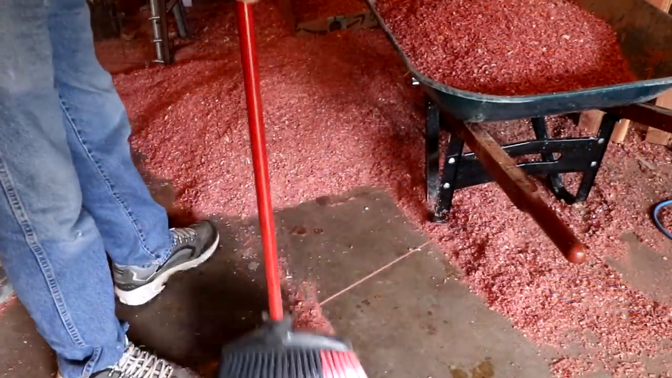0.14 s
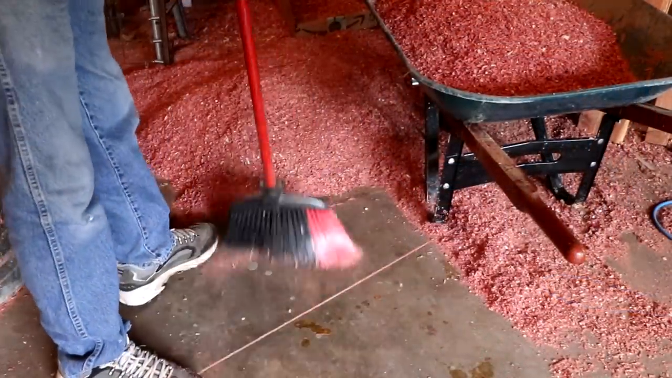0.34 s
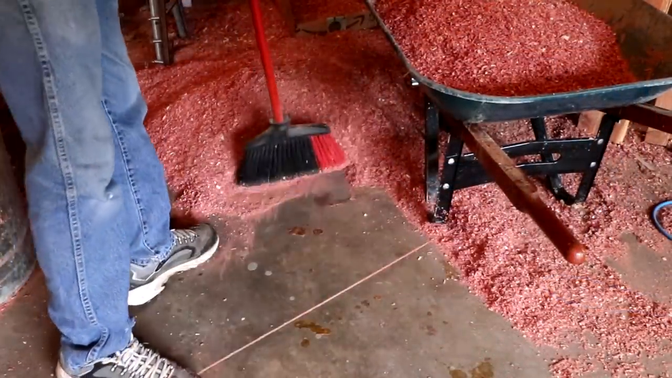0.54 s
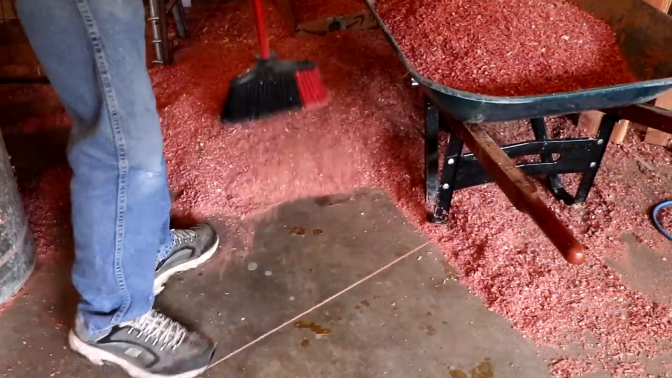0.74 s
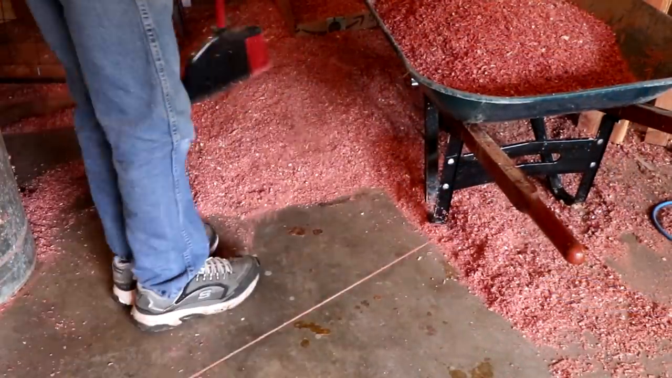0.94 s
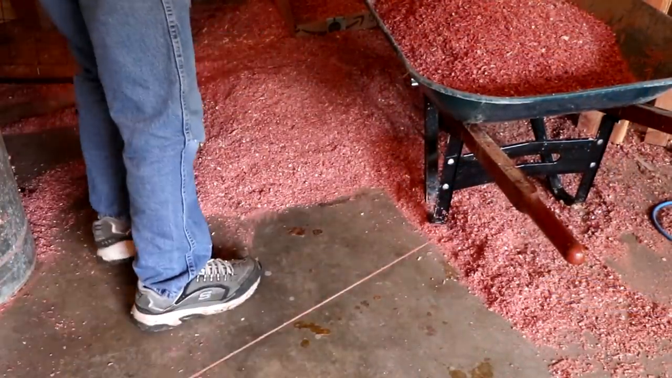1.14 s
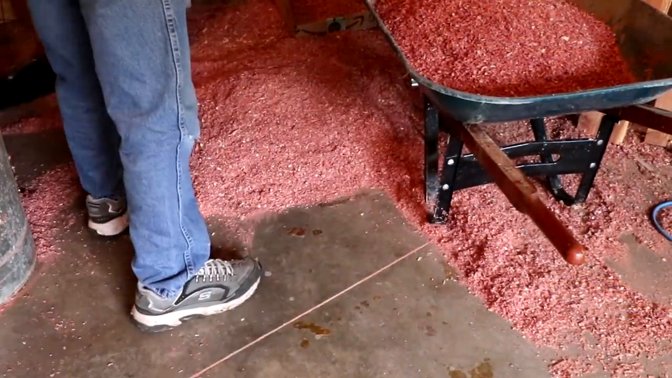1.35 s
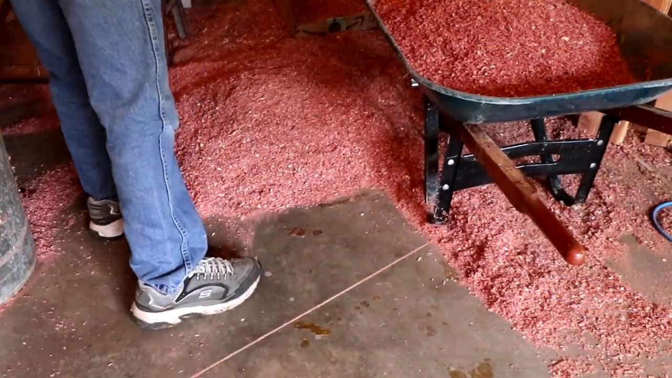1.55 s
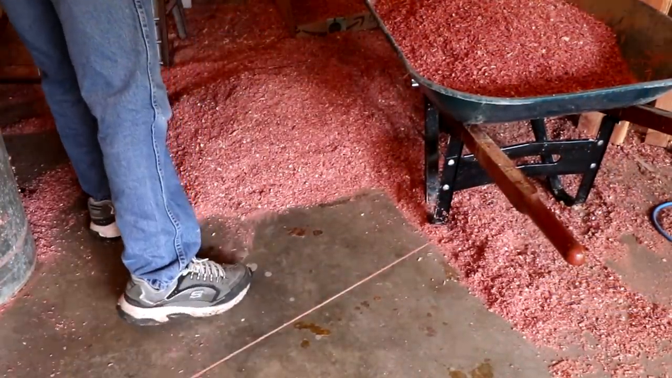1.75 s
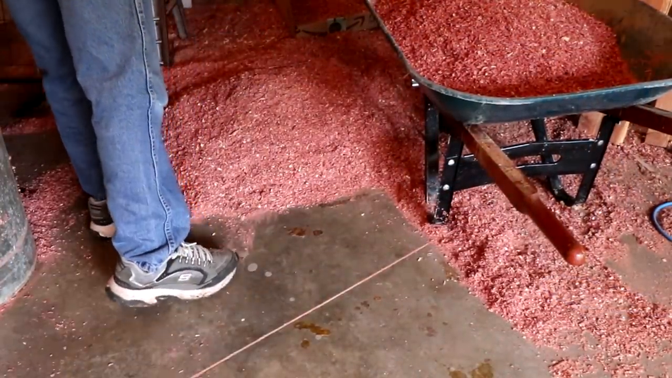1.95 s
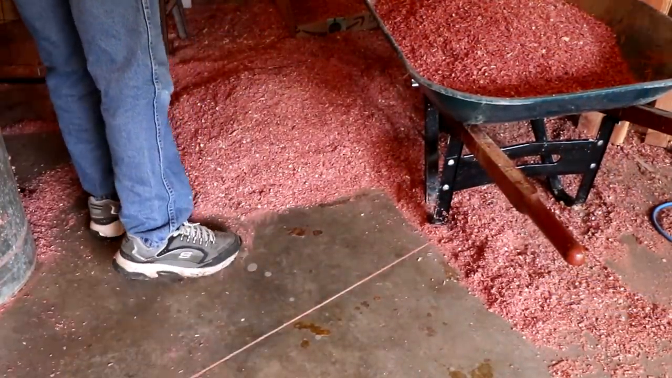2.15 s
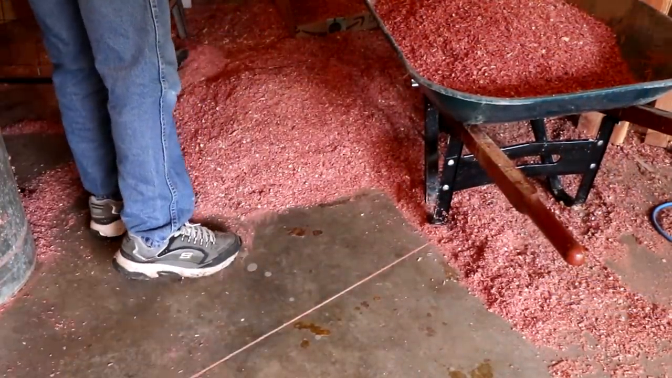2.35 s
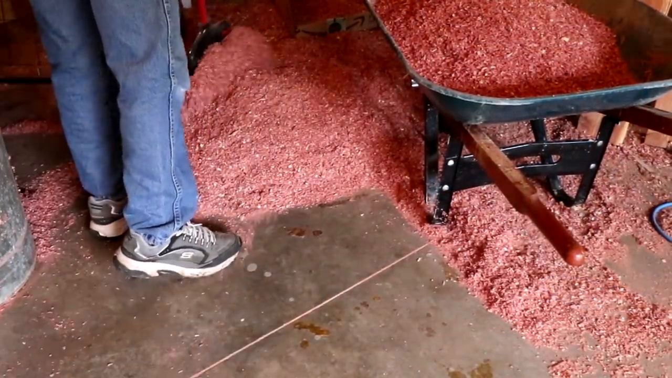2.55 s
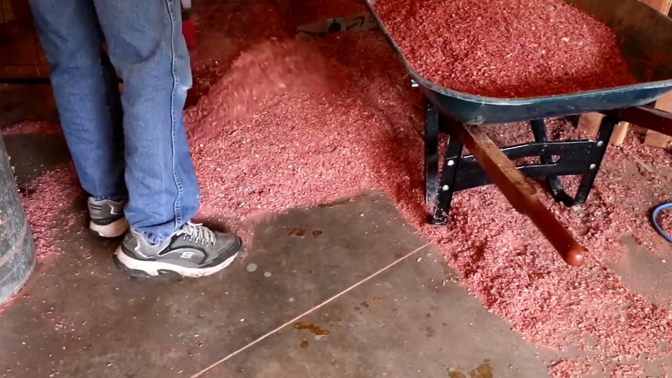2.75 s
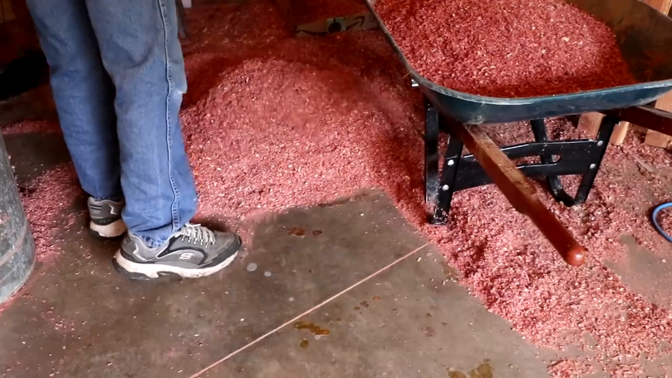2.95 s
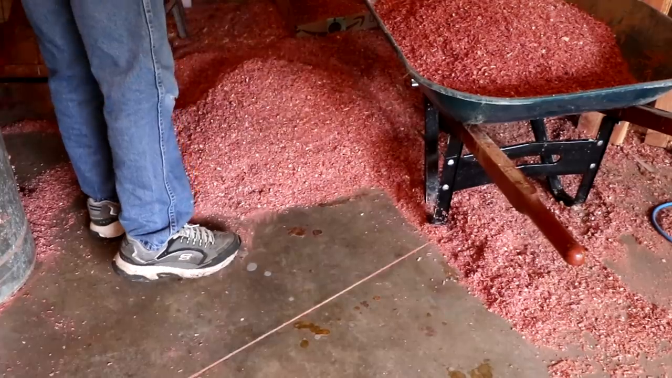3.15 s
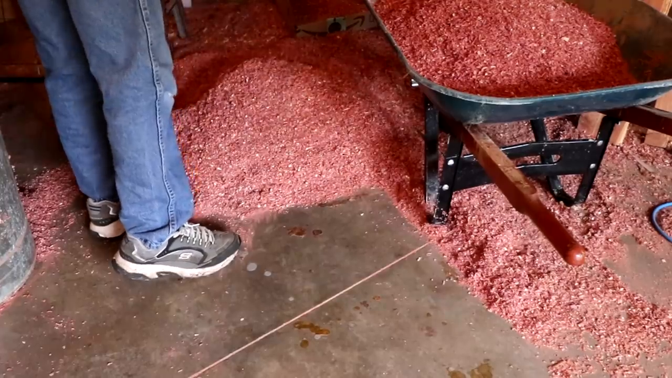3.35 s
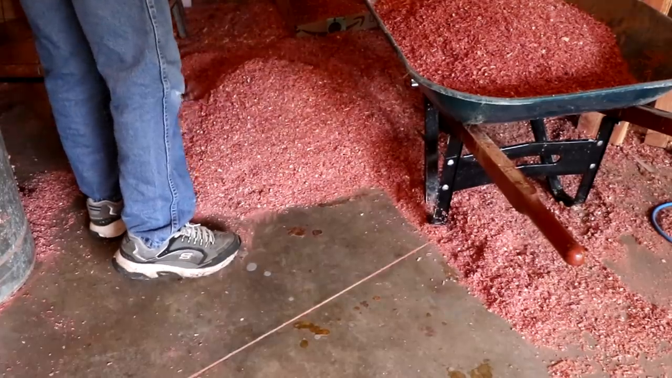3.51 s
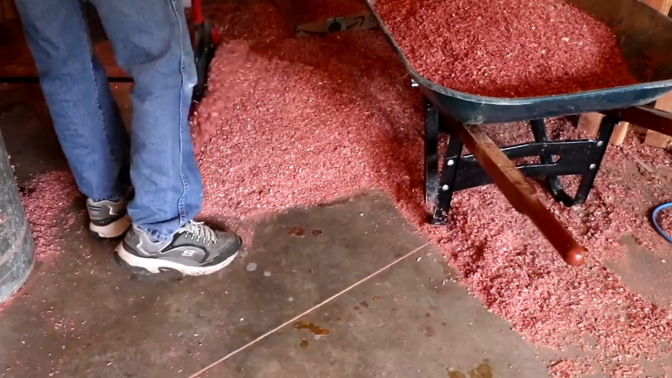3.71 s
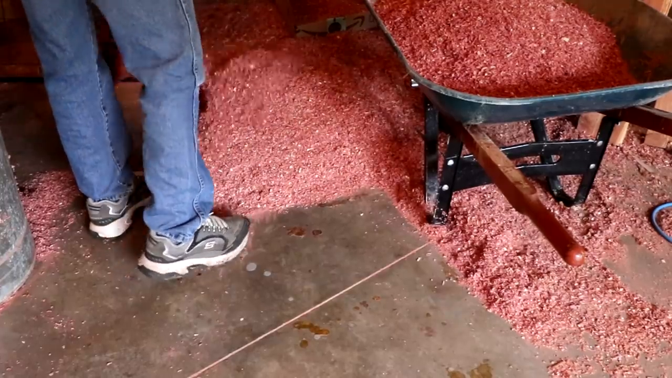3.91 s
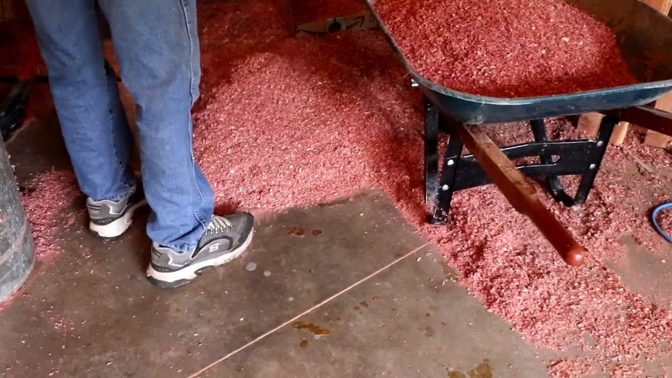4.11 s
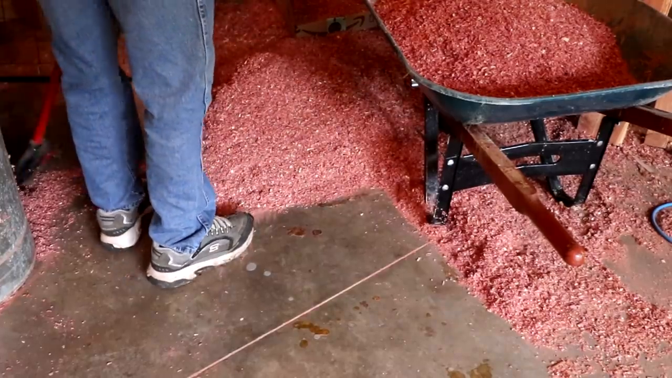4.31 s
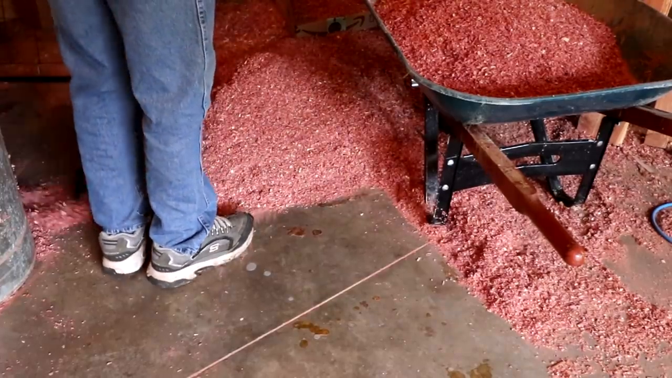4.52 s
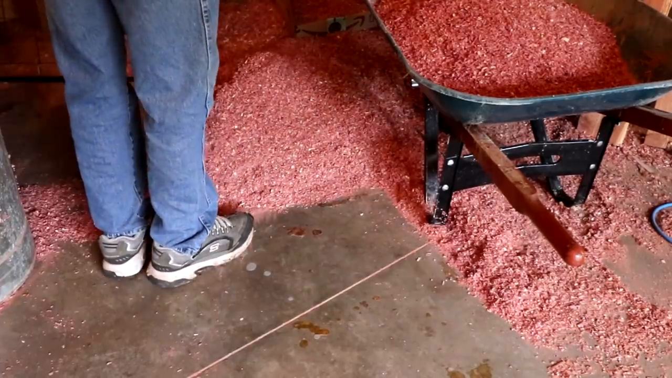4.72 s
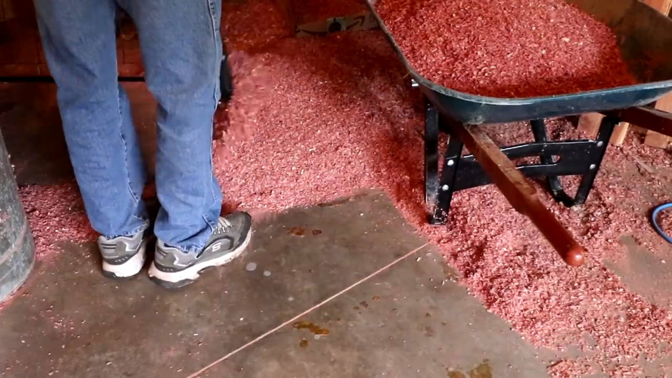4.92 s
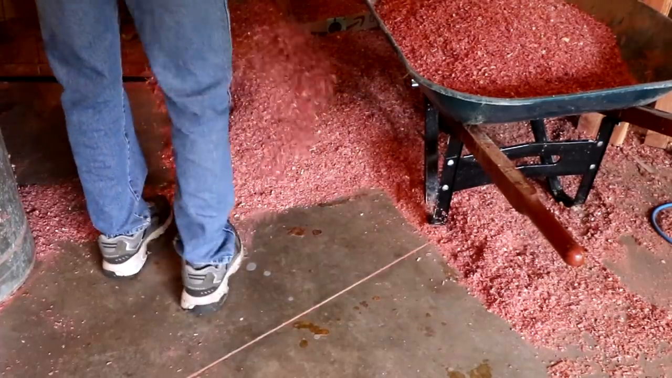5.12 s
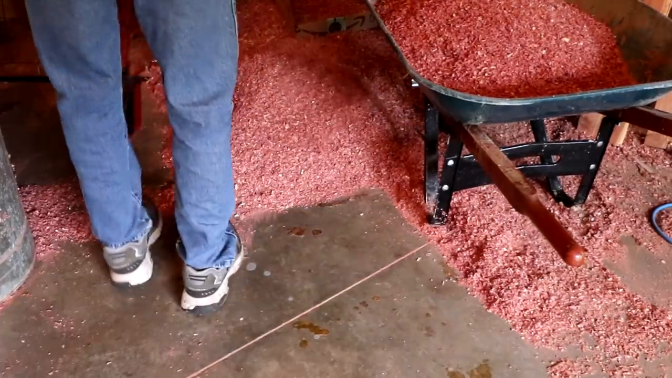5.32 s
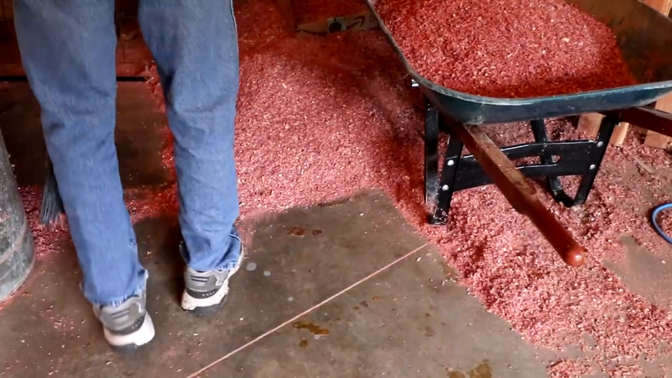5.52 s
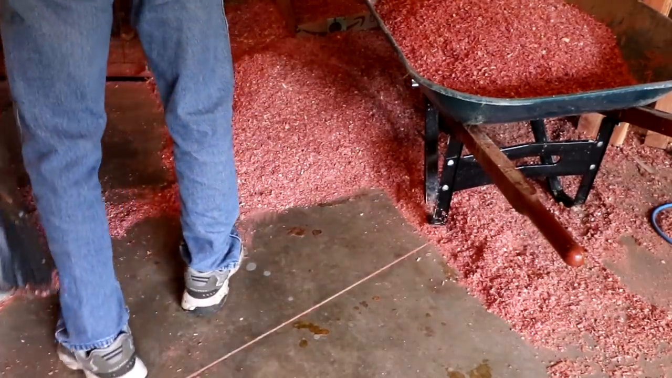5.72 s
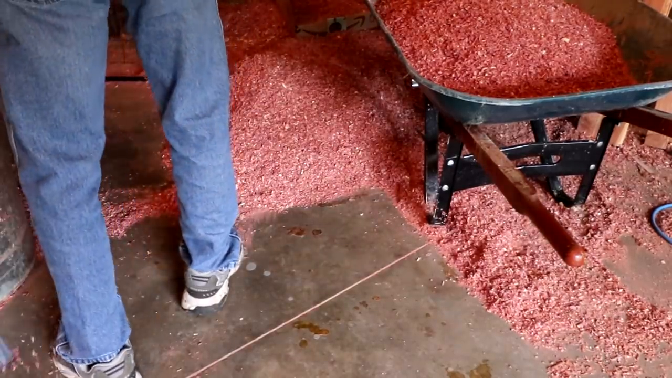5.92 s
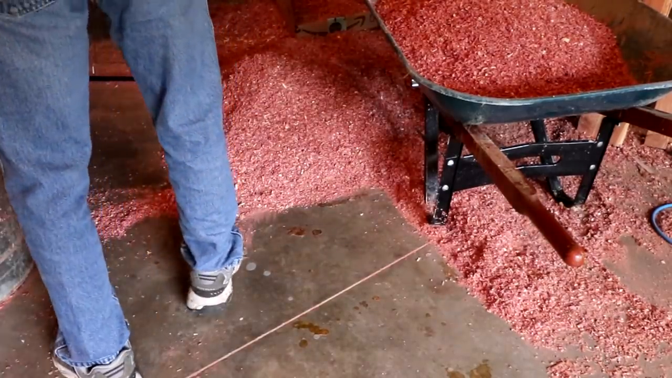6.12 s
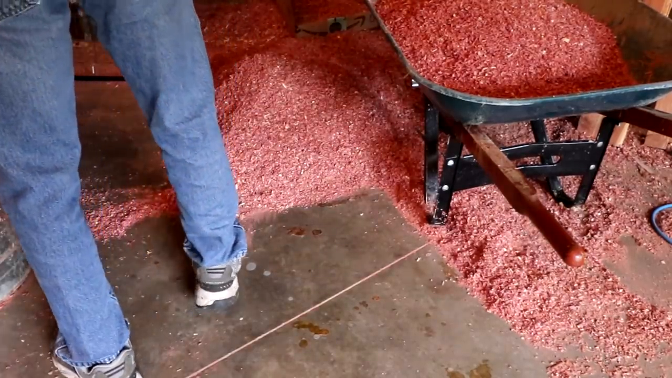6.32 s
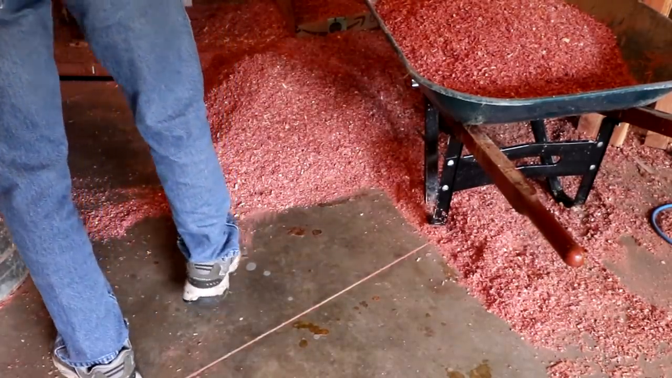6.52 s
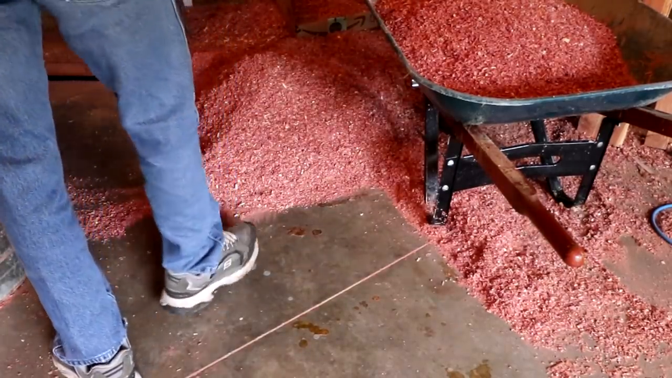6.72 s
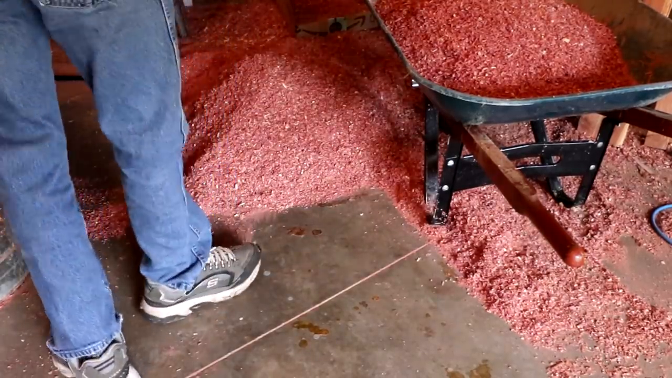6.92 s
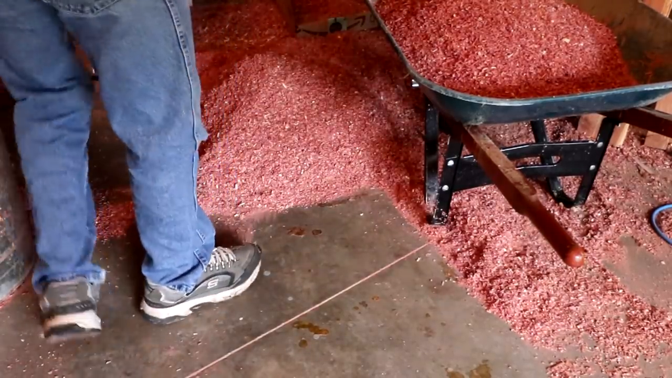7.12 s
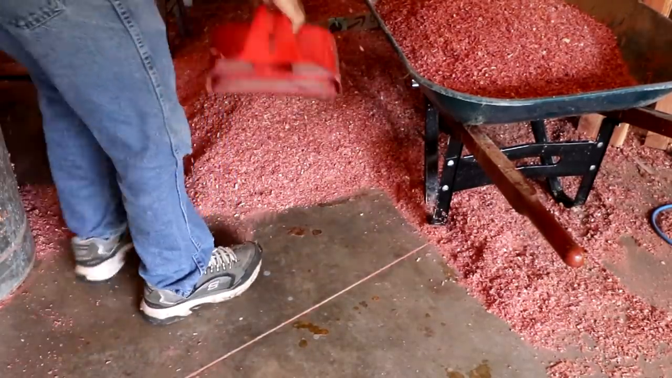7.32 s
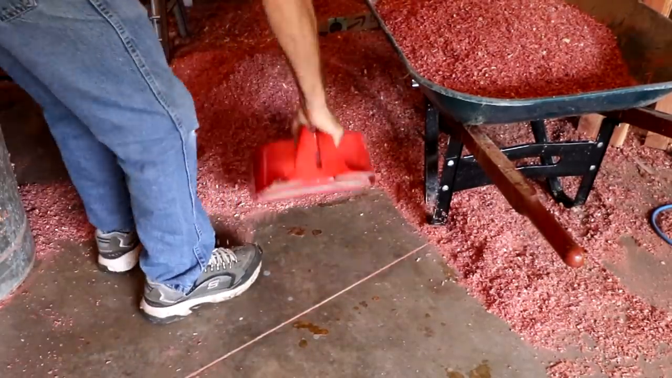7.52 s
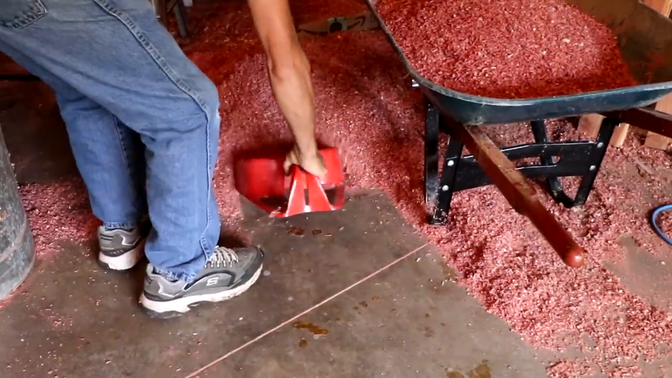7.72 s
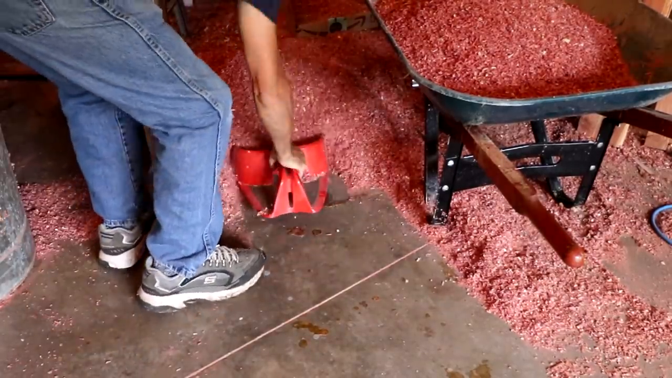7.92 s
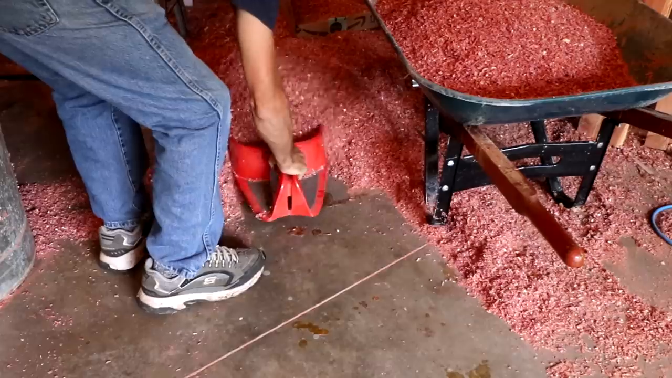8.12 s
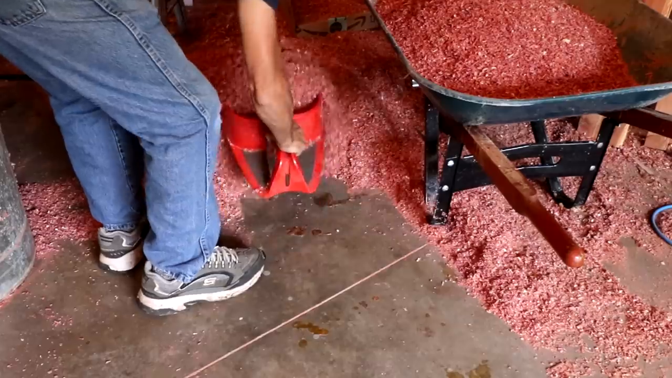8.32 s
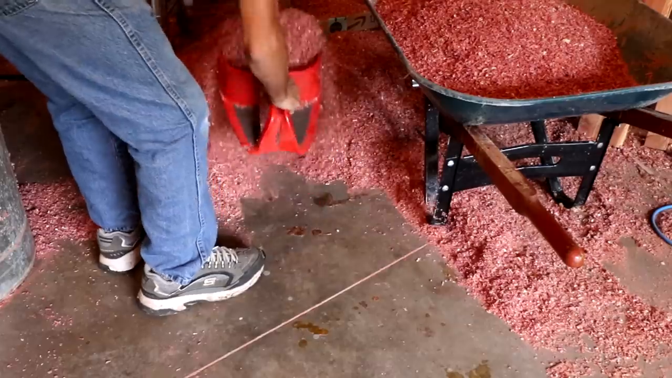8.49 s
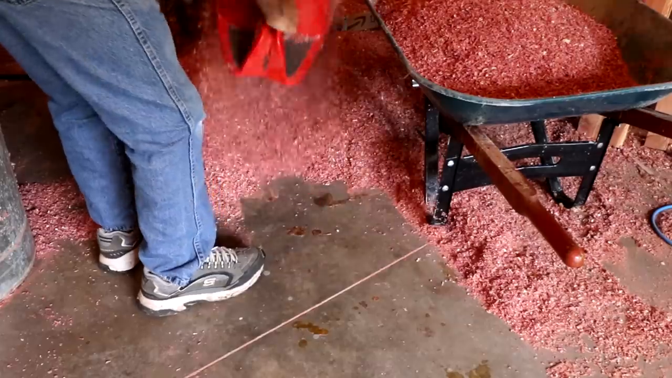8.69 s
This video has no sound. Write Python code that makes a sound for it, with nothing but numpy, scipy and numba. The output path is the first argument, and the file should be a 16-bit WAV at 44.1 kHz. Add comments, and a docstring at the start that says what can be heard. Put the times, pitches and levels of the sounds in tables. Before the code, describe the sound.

A small shed with short reflections, heard close in stereo, over faint air hiss and an intermittent low hum. From 0 to 0.6 s a broom sweeps dry shavings over concrete in a strong, bristly swish, followed by a short gritty scrape at 1.0 and a soft scuff with a heel thud near 1.4. Gentler rustling strokes come around 2.1 and 3.4, then a sharper brush at 4.3 trailing into rustle until 4.7, and a small scuff at 5.1. From about 5.95 to 6.7 the broom knocks a hollow bin: irregular clacks and rattles, the hardest crack at 6.33, a deep boom at 6.65 rumbling on. Faint steps and rustle follow, with dull thuds near 7.5. At 7.72 a plastic dustpan slaps down loudly with a low thump, its lip rasping and chattering on concrete until 8.05. A soft thud, then quiet faint rustling to the end at about 8.7.

```python
"""Sweeping a shed floor

A broom sweeps wood shavings over concrete, soles scuff, and heels and broom head thud: shaped noise and damped modes.
The broom knocks a hollow bin; a plastic dustpan slaps down and is shoved into the heap, its lip chattering.
Deep noise rumbles under two of the bin knocks and the pan's landing; air noise and intermittent hum sines lie beneath.
A camera with two close ports turns down after loud peaks and clips what still exceeds full scale."""
import sys
import numpy as np
from scipy import signal
from scipy.fft import rfft, irfft
from scipy.io import wavfile
from scipy.ndimage import uniform_filter1d, map_coordinates
from numba import njit

SR = 44100
rng = np.random.default_rng(int(sys.argv[2]) if len(sys.argv) > 2 else 0)


def to_wav(s):
    """Save 16-bit WAV."""
    ch = np.atleast_2d(s).T  # columns
    pcm = np.round(np.clip(ch, -1, 1) * 32767)  # PCM
    wavfile.write(sys.argv[1], SR, pcm.astype(np.int16))


def gain_from_db(level_db):
    """Turn a decibel level (scalar or array-like) into a linear amplitude factor."""
    decades = np.asarray(level_db, float) / 20
    return 10 ** decades


N = 385855
TIME = np.arange(N) / SR
OPPOSITE = np.array([[1], [-1]])  # signs of a difference signal at the left and right port


def on_log_hz(points, hz):
    """Logarithmic frequency scale: interpolate a (Hz, value) table along it."""
    f, v = np.transpose(points)
    return np.interp(np.log(hz + 1), np.log(f + 1), v)


def unit(x):
    """Normalisation: scale to rms 1."""
    return x / np.sqrt(np.mean(x ** 2))


def colour(x, points):
    """Minimum-phase filtering: a causal filter of unit energy, from the folded cepstrum of the log gain."""
    size = 4096
    hz = np.arange(size // 2 + 1) * SR / size
    cepstrum = irfft(np.log(gain_from_db(on_log_hz(points, hz))))
    cepstrum[1:size // 2] *= 2
    cepstrum[size // 2 + 1:] = 0
    h = irfft(np.exp(rfft(cepstrum)))[:size // 2]
    return signal.oaconvolve(x, h / np.sqrt(np.sum(h ** 2)))[:len(x)]


def ring(x, modes):
    """Modal resonance: damped sines (Hz, dB, t60 in s) as a filter of unit energy."""
    t = TIME[:SR // 2]
    h = 0
    for k, (f, db, t60) in enumerate(modes):
        # neighbours move in opposite sense, so little air is pushed below them
        h = h + (-1) ** k * gain_from_db(db) * np.sin(2 * np.pi * f * t) * 1000. ** (-t / t60)
    return signal.oaconvolve(x, h / np.sqrt(np.sum(h ** 2)))[:len(x)]


def walk(rate):
    """Slow random modulation: levels held 1 / rate s, slewed twice; spread near 1."""
    k = int(SR / rate)
    held = np.repeat(rng.standard_normal(N // k + 1), k)
    return 1.3 * uniform_filter1d(uniform_filter1d(held, k), k)[:N]


def grains(spread_db, hold_ms, count=N):
    """Granular friction: noise of rms 1 whose size jumps every hold_ms, rare grains much larger."""
    k = max(int(hold_ms * SR / 1000), 1)
    jumps_db = spread_db * np.minimum(rng.exponential(size=count), 4)
    size = np.repeat(gain_from_db(jumps_db), k)[:count]
    return unit(size * rng.standard_normal(count))


def gains(table):
    """Piecewise-linear envelopes: the dB columns of a time table, -99 dB outside it."""
    rows = np.array(table)
    return [np.interp(TIME, rows[:, 0], c, left=-99, right=-99) for c in rows.T[1:]]


def ports(x, pan_db, lead):
    """Level and time differences: a tilt in dB, and the left port hears x `lead` samples earlier."""
    late = map_coordinates(x, [np.arange(len(x)) - lead], order=3)
    return np.array([x * gain_from_db(pan_db / 2), late * gain_from_db(-pan_db / 2)])


# Reverberation time of the shed. Each row: frequency in Hz, t60 in s.
SHED_T60 = [(100, 0.28), (1000, 0.2), (4000, 0.28), (14000, 0.24)]


def shed(x, wet_db):
    """Diffuse reverberation: noise decaying by octave, shared in the bass, differing by port higher up."""
    t = TIME[:SR // 2]
    hz = np.arange(len(t) // 2 + 1) * SR / len(t)
    mid, side = rfft(rng.standard_normal((2, len(t))))
    both = mid + np.minimum(hz / 1900.0, 1) * side * OPPOSITE
    h = 0
    for centre in 90 * 2. ** np.arange(8):
        octave = np.maximum(1 - np.abs(np.log2((hz + 1) / centre)), 0)
        h = h + irfft(both * octave, len(t)) * 1000. ** (-t / on_log_hz(SHED_T60, centre))
    h = h * np.minimum(t / 0.0009, 1)  # reflections build up over 0.9 ms
    h = h / np.sqrt(np.mean(np.sum(h ** 2, axis=1)))
    return gain_from_db(wet_db) * signal.oaconvolve(x[None], h)[:, :len(x)]


def moving_shed(x, wet_db, count=4):
    """Changing reflections: a moving source crossfades through a cycle of `count` patterns."""
    place = TIME / .09  # 90 ms from one pattern to the next
    wet = 0
    for k in range(count):
        distance = np.abs((place - k + count / 2) % count - count / 2)
        wet = wet + shed(x * np.cos(np.pi / 2 * np.minimum(distance, 1)), wet_db)
    return wet


# Spectrum of shed air and microphone hiss. Each row: frequency in Hz, relative density in dB per Hz.
AIR_SPECTRUM = [(15, -60), (25, -7), (53, -8.5), (101, -5), (140, -11.5), (367, -13.5), (398, -13.5),
                (580, -15.5), (967, -13.5), (1890, -21.5), (2220, -20.5), (2410, -20), (15400, -33)]
# Coherence of that noise between the ports. Each row: frequency in Hz, likeness from 0 to 1.
AIR_LIKENESS = [(60, 0.89), (130, 0.72), (290, 0.23), (640, 0.5), (1400, 0.13), (3090, 0), (6800, 0.67),
                (15000, 0)]


def air():
    """Broadband noise of partial coherence: shed air and microphone hiss, slowly wavering."""
    hz = np.arange(N // 2 + 1) * SR / N
    alike = np.clip(on_log_hz(AIR_LIKENESS, hz), 0, .99)
    mid, side = rfft(rng.standard_normal((2, N))) * gain_from_db(on_log_hz(AIR_SPECTRUM, hz))
    spectrum = mid * np.sqrt(1 + alike) + side * np.sqrt(1 - alike) * OPPOSITE
    noise = irfft(spectrum, N + N % 2)[:, :N]
    return unit(noise) * gain_from_db(-51 + 0.35 * walk(2.3))


# Intermittent hum tones, before their wavering.
# Each row: start in seconds, length in seconds, nominal frequency in Hz, nominal level in dB rms.
HUM_TONES = [(-0.64, 2.6, 87.5, -60), (5, .75, 77, -62), (5.5, .6, 140, -64), (8.0, 0.46, 95, -58),
             (0, 1.0, 112, -59.5), (3.5, 0.95, 112, -61), (5, 0.37, 112, -56), (5.5, .3, 65, -66),
             (8.5, .3, 112, -58.5), (2.5, 1.9, 300, -67.5)]


def hum():
    """Tonal hum: sines that come and go, sharing one swell in level and one drift in pitch."""
    tones, swell_db, drift = 0, 1.3 * walk(4.03), 1 + 0.0068 * walk(9.9)
    fade_s = .1  # centred on each start and end
    for s, length, f, db in HUM_TONES:
        on = np.clip(np.minimum(TIME - s, s + length - TIME) / fade_s + .5, 0, 1)
        tone = np.sin(2 * np.pi * np.cumsum(f * drift) / SR)
        tones = tones + np.sqrt(2) * on * gain_from_db(db + swell_db) * tone
    return tones


def effort(s, rise, hold, fall, db):
    """Gesture envelope: power that climbs in dB, holds and falls; rise and fall are times for 20 dB."""
    before = np.clip((s - TIME) / max(rise, 1e-3), 0, 3)
    after = np.clip((TIME - s - max(hold, 0)) / max(fall, 1e-3), 0, 4)
    # exponents above 1: a sudden touch or lift and a round top
    return gain_from_db(db - 20 * (before ** 1.59 + after ** 1.14)) ** 2


# Broom strokes and slides of shavings down the heap. Each row: time of full strength in seconds,
# rise in seconds, hold in seconds, fall in seconds, relative bristle hiss in dB.
BROOM_SWEEPS = [(0.0, .01, .0, 0.11, -40.5), (0.08, .003, .005, 0.035, -33),
                (0.203, 0.084, 0.31, 0.079, -30), (0.537, 0.036, .0, 0.025, -29),
                (0.65, 0.14, 0.26, 0.074, -51), (0.79, .003, .0, .015, -44), (0.9, .003, 0.026, .02, -54),
                (0.996, .004, 0.028, .04, -36.5), (1.78, .03, .0, 0.46, -45),
                (2.03, 0.22, 0.077, 0.41, -35), (2.4, .3, 0.18, 0.89, -45.5),
                (2.87, 0.33, 0.025, 0.32, -44), (3.23, .04, 0.085, .2, -41),
                (3.373, 0.15, 0.076, 0.21, -34), (3.8, 0.53, .0, 0.15, -46.5),
                (3.95, 0.28, 0.11, 0.2, -49.5), (4.326, 0.084, 0.0041, .08, -27),
                (4.52, 0.13, 0.17, 0.16, -35.5), (4.96, 0.28, .0, 0.31, -45.5), (5.3, 0.2, .0, .3, -42),
                (6.97, .1, 0.088, .03, -54), (7.21, .1, 0.43, 0.064, -50), (7.43, 0.1, 0.033, .3, -47),
                (8.17, .08, .2, 0.61, -54), (8.68, 0.96, 0.072, .1, -45)]
# Shoes and broom head dragged through shavings. Each row: time of full strength in seconds,
# rise in seconds, hold in seconds, fall in seconds, relative rustle in dB, scuff against that rustle in dB.
SHAVING_DRAGS = [(0.023, .05, 0.095, .1, -46.5, 1), (0.204, 0.078, 0, 0.16, -39, -2),
                 (0.53, 0.06, .0, 0.1, -41.5, -1), (0.75, 0.28, 0.19, 0.11, -59.5, 2),
                 (1.003, 0.0044, 0.0046, 0.027, -34.5, -5.5), (1.034, 0.027, 0, 0.026, -31, -2),
                 (1.19, 0.092, 0.0089, 0.2, -61, 7.5), (1.401, 0.01, 0.017, 0.049, -36, -2.5),
                 (1.86, 0.4, 0.014, 0.49, -62.5, 6.5), (2.17, 0.15, 0.011, 0.21, -43.5, -5),
                 (4.07, .05, 0.011, .05, -63, 4), (4.316, 0.07, 0.041, 0.19, -37, 2),
                 (4.465, 0.096, 0.099, 0.12, -37, -1.5), (5.04, 0.11, 0.057, 0.13, -51, 1),
                 (5.129, 0.031, 0.021, 0.032, -39.5, -3.5), (5.3, .2, .0, .3, -71, 11),
                 (5.73, .1, .03, .1, -60, 1), (7.014, 0.29, .0, 0.014, -51, 3),
                 (7.217, 0.17, 0.094, 0.15, -51.5, -6), (7.43, 0.16, .02, 0.4, -47.5, 3),
                 (7.711, 0.057, .0, 0.0087, -50.5, -4), (8.725, 0.12, 0.036, .05, -61, 9.5)]


def pressures():
    """Energy summation: powers of all gestures add, giving dB levels of hiss, grit, rustle and scuff."""
    sweep = sum(effort(*row) for row in BROOM_SWEEPS)
    drags = [effort(*row[:5]) for row in SHAVING_DRAGS]
    soles = sum(p * gain_from_db(row[5]) ** 2 for p, row in zip(drags, SHAVING_DRAGS))
    grit = gain_from_db(2) ** 2 * sum(drags)
    # a sweep also moves shavings and rubs the floor under the bristles
    rustle = gain_from_db(-12.5) ** 2 * sweep + sum(drags)
    scuff = gain_from_db(-22) ** 2 * sweep + soles
    return [10 * np.log10(p) for p in (sweep, grit, rustle, scuff)]


# Spectra of bristles over grit, of tumbling shavings and of soles on concrete.
# Each row: frequency in Hz, relative density in dB per Hz.
BRISTLE_SPECTRUM = [(1200, -37), (2400, -8.5), (3500, -5), (5000, -3), (7000, -2), (9000, -4),
                    (12000, -10.5), (15500, -17.5)]
RUSTLE_SPECTRUM = [(700, -39), (1250, -1.5), (1700, -0.5), (2200, -1), (3000, -6), (5000, -24.5)]
SCUFF_SPECTRUM = [(30, -59), (120, -21.5), (300, -2), (600, 4.5), (1100, 1), (2000, -44.5)]
# Direction of the sweeping. Each row: time in seconds, level tilt of left minus right in dB.
SWEEP_PLACE = [(0.0, 1), (0.17, -2), (0.5, -1.5), (1.0, -2), (1.78, 1.5), (2.4, -1), (3.0, -2.5), (3.36, 4),
               (3.6, -2), (4.15, -2), (4.3, 6), (4.42, 0.5), (5.12, -1.5), (7.29, 2), (7.7, -2), (8.75, -1)]


def strokes():
    """Friction noise: bristles tick over grit, shavings tumble, soles drag; a wide source, so treble differs by port."""
    hiss_db, grit_db, rustle_db, scuff_db = pressures()
    pan_db = np.interp(TIME, *np.transpose(SWEEP_PLACE))
    hiss = np.array([colour(grains(3.3, .3), BRISTLE_SPECTRUM) for _ in range(2)])
    hiss = hiss * gain_from_db(hiss_db + 0.85 * walk(30))
    grit = np.array([colour(grains(1.8, 0.28), BRISTLE_SPECTRUM) for _ in range(2)]) * gain_from_db(grit_db)
    # under a drag the shavings muffle the grit
    hiss = hiss + signal.sosfilt(signal.butter(2, 5000, fs=SR, output="sos"), grit)
    rustle = colour(grains(2.8, .6), RUSTLE_SPECTRUM) * gain_from_db(rustle_db + 0.55 * walk(40))
    scuff = colour(grains(4.2, 2.2), SCUFF_SPECTRUM) * gain_from_db(scuff_db + 0.5 * walk(25))
    direct = ports(0.85 * hiss[0] + rustle + 0.63 * scuff, pan_db, 2.66)
    width = 0.23 * hiss[1] * OPPOSITE
    return direct + width + moving_shed(hiss[0] + rustle + scuff, -3.5)


# Heels and broom head meeting the floor. Each row: time in seconds, relative blow in dB.
FLOOR_BLOWS = [(0.078, -54), (0.2, -54), (0.537, -49), (1.035, -46), (1.465, -44), (1.856, -54),
               (2.179, -48), (4.154, -51), (5.212, -49), (7.455, -46), (7.491, -44), (8.084, -44)]
# Modes of the thud. Each row: frequency in Hz, relative level in dB, t60 in s.
THUD_MODES = [(140, -0.5, 0.047), (220, 3, 0.031), (336, 2, 0.033), (467, -38.5, 0.0068)]


def steps():
    """Impulsive excitation: heels and broom head settle on concrete with short dull thuds."""
    blow = np.zeros(N)
    push = np.hanning(int(0.0014 * SR))
    for s, db in FLOOR_BLOWS:
        i = int(s * SR)
        blow[i:i + len(push)] += gain_from_db(db) * push
    x = ring(blow, THUD_MODES)
    return ports(x, 0, 2.0) + shed(x, -6)


# Parts of the broom's knocks on the bin; rows a few milliseconds apart together form one knock.
# Each row: time in seconds, relative crack in dB, relative clack in dB,
# relative bin boom in dB, centre of the boom in Hz, rattle t60 in s.
KNOCK_PARTS = [(5.8433, -43.5, -31.5, -54.5, 900, 0.053), (5.875, -46, -33, -62, 900, 0.0091),
               (5.952, -17.5, -22, -29.5, 112, 0.049), (5.9570, -21, -8, -16, 1000, 0.0094),
               (5.9660, -26, -20, -27.5, 800, 0.14), (6.135, -20.5, -22, -47, 900, 0.087),
               (6.2197, -18.5, -25.5, -57, 500, 0.016), (6.2391, -10.5, -20, -52, 870, 0.034),
               (6.3320, 12, 12.5, -20, 800, 0.044), (6.338, 23, 1, -22, 600, 0.038),
               (6.345, 18, 4, -11.5, 600, 0.016), (6.509, -10, -18, -36.5, 343, 0.18),
               (6.551, -3.5, -25, -50, 600, 0.069), (6.555, -9, 6.5, -8.5, 890, 0.037),
               (6.6528, -12, -4, -14, 890, 0.11), (6.661, -30, 9.5, 0, 306, 0.011),
               (6.6850, -28, -2, -9.5, 302, 0.05), (6.8961, -41, -28, -50, 1050, 0.11),
               (7.0868, -39.5, -32.5, -61, 1000, 0.018)]
# Modes of the hollow bin. Each row: frequency in Hz, relative level in dB, t60 in s.
BIN_MODES = [(55, -8, .25), (108, 4, 0.14), (188.7, -3, 0.17), (275, 2, 0.047), (383.3, -4, 0.14),
             (481, -25, 0.024), (669, -3.5, 0.13), (800, -15, 0.13), (1140, -57, 0.033)]
# Spectra of the sharp crack and of the handle's clack. Each row: frequency in Hz, relative density in dB per Hz.
CRACK_SPECTRUM = [(900, -25.5), (1800, -1), (2800, 2), (3900, 2), (6200, 2.5), (8200, -2.5), (11000, -7),
                  (15400, -24)]
CLACK_SPECTRUM = [(600, -18.5), (1200, 2.5), (2200, 0.5), (3200, -1.5), (5500, -23)]


def knocks():
    """Impact and rattle: sharp contacts and dying noise feed the crack, the handle's clack and the hollow bin."""
    out, t = np.zeros((2, N)), TIME[:int(.6 * SR)]
    for s, crack_db, clack_db, boom_db, boom_hz, t60 in KNOCK_PARTS:
        noise = np.array([grains(2.2, .4, count=len(t)) for _ in range(2)]) * np.minimum(t / 0.0016, 1)
        rattle = noise * 1000. ** (-t / t60)
        rattle[:, 0] += 2.5  # the sharp contact
        # the camera body scatters short waves, so each port hears its own crack, the left one louder
        crack = np.array([colour(r, CRACK_SPECTRUM) for r in rattle])
        crack = crack * gain_from_db(crack_db + np.array([[1.5], [-2.5]]))
        clack = gain_from_db(clack_db) * colour(rattle[0], CLACK_SPECTRUM)
        # the heavy bin rocks on longer than the crack
        rocking = noise[0] * 1000. ** -((t / (2.14 * t60)) ** 0.9)
        hollow = .5 * ring(rocking, BIN_MODES) + 1.01 * colour(rocking, SCUFF_SPECTRUM)
        # where the bin is struck sets which modes speak
        where = [(boom_hz / 12, -24), (boom_hz / 4, -6), (boom_hz, 0), (boom_hz * 1.03, -3), (boom_hz * 4, -24)]
        boom = gain_from_db(boom_db) * colour(hollow, where)
        direct = crack + ports(clack, .1, 5.8) + ports(boom, 1.1, 5.5)
        i = int(s * SR)
        out[:, i:i + len(t)] += direct + shed(crack[0] + clack + boom, -4.5)
    return out


# Deep rumbles under two of the bin knocks and the dustpan's landing.
# Each row: start in seconds, relative level in dB, t60 in s.
DEEP_THUMPS = [(5.957, -48, .3), (6.655, -27.5, 0.68), (7.72, -20.5, 0.17)]
# Spectrum of the rumble. Each row: frequency in Hz, relative density in dB per Hz.
DEEP_SPECTRUM = [(20, -2), (45, -3), (110, -6), (220, -16), (500, -37)]


def thumps():
    """Exponential decay: deep noise dies away under two bin knocks and the pan's landing, alike at both ports."""
    level = sum(gain_from_db(db) * (TIME >= s) * 1000. ** (-np.abs(TIME - s) / t60) for s, db, t60 in DEEP_THUMPS)
    return colour(level * rng.standard_normal(N), DEEP_SPECTRUM)


# Dustpan landing. Each row: time in seconds, relative blow in dB.
PAN_BLOWS = [(7.717, -18.5), (7.723, 10)]
# Modes of the plastic pan. Each row: frequency in Hz, relative level in dB, t60 in s.
DUSTPAN_MODES = [(123, 1, 0.09), (268, -21, 0.063), (354, -17.5, 0.015), (500, 15.5, 0.019),
                 (992, 12.5, 0.033), (1430, 10, 0.012), (2350, 1, 0.034), (3400, -19, 0.011),
                 (5500, -27.5, .006)]


def pan_slap():
    """Modal impact: brief pushes set the plastic pan ringing as it slaps down."""
    blow = np.zeros(N)
    push = np.hanning(int(0.0003 * SR))
    for s, db in PAN_BLOWS:
        i = int(s * SR)
        blow[i:i + len(push)] += gain_from_db(db) * push
    return ring(blow, DUSTPAN_MODES)


def as_modes(peaks):
    """Bandwidth and damping: turn peaks (Hz, width in Hz, dB) into modes (Hz, dB, t60 in s)."""
    return [(f, db, np.log(1000) / (np.pi * w)) for f, w, db in peaks]


# Course of the shove. Each row: time in seconds, then relative levels in dB of lip chatter, pan body, shavings.
PAN_SHOVE = [(7.73, -20, -23, -17), (7.736, -13, -28, -29), (7.756, -21, -25.5, -28),
             (7.83, -13, -18.5, -20.5), (7.922, -14.5, -15, -30), (7.982, -28.5, -22, -36.5),
             (8.022, -24.5, -24, -40.5), (8.06, -43, -34, -48), (8.075, -33, -29, -45),
             (8.092, -70, -50, -55)]
# Resonances of the lip and of the pan body. Each row: frequency in Hz, width in Hz, relative level in dB.
LIP_PEAKS = [(1550, 240, 16.5), (1790, 83, 16.5), (2050, 810, 13), (2910, 270, 12)]
BODY_PEAKS = [(426, 240, -17.5), (741, 29, -19), (990, 560, 8)]
# Spectrum of the lip rasping on concrete. Each row: frequency in Hz, relative density in dB per Hz.
RASP_SPECTRUM = [(590, -32), (1000, -9), (1660, 1.5), (2340, -6.5), (2940, -3.5), (5500, -20), (7150, -43),
                 (12100, -120)]


def pan_shove():
    """Stick-slip friction: the lip catches on concrete and rings the plastic, the bottom drags, shavings hiss."""
    lip_db, body_db, chips_db = gains(PAN_SHOVE)
    slips = grains(1.6, 1.5) * gain_from_db(2.0 * walk(200))
    lip = .5 * ring(slips, as_modes(LIP_PEAKS)) + 1.12 * colour(slips, RASP_SPECTRUM)
    drag = grains(2.9, 2.5)  # the flat bottom drags on its own grit
    body = 0.51 * ring(drag, as_modes(BODY_PEAKS)) + 0.52 * colour(drag, SCUFF_SPECTRUM)
    chips = colour(grains(1.2, 0.41), BRISTLE_SPECTRUM)
    return gain_from_db(lip_db) * lip + gain_from_db(body_db) * body + gain_from_db(chips_db) * chips


def dustpan():
    """Direct and reflected sound: the slap and the shove reach both ports together with the shed."""
    x = pan_slap() + pan_shove()
    return ports(x, -1.2, 1.0) + moving_shed(x, -9, count=3)


def scene():
    """Superposition: the pressures of all sources add at the two ports."""
    return air() + hum() + strokes() + steps() + knocks() + thumps() + dustpan()


@njit
def follow(x, attack, release):
    """Peak detection: a one-pole follower, quick up and slow down."""
    e, out = 0., np.empty(len(x))
    for i in range(len(x)):
        e += (x[i] - e) * (attack if x[i] > e else release)
        out[i] = e
    return out


def roll_off(x):
    """The treble ends steeply here."""
    return signal.sosfilt(signal.butter(12, 15550, fs=SR, output="sos"), x)


def record(dry):
    """Gain control: bass is thinned below 32 Hz, loud peaks pull the level down, what gets past clips."""
    dry = signal.sosfilt(signal.butter(2, 32, "high", fs=SR, output="sos"), dry)
    attack_s, release_s = 0.01, .1
    envelope = follow(np.abs(dry).max(axis=0), 1 / (attack_s * SR), 1 / (release_s * SR))
    gain = np.minimum(gain_from_db(-15.5) / (envelope + 1e-9), 1) ** 0.91  # threshold -15.5 dB, near-limiting slope
    mix = np.clip(dry * gain, -1, 1)
    return roll_off(mix)


dry = scene()
out = record(dry)
to_wav(out)
```